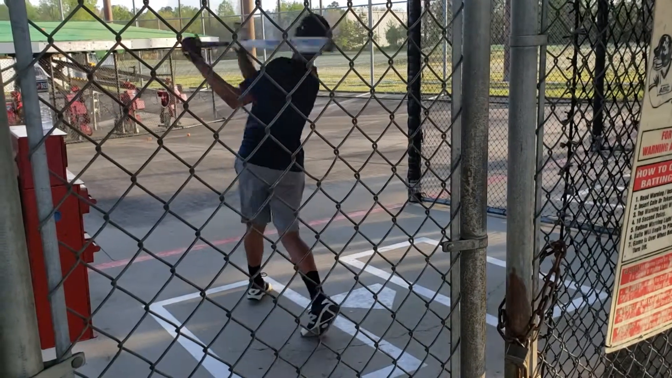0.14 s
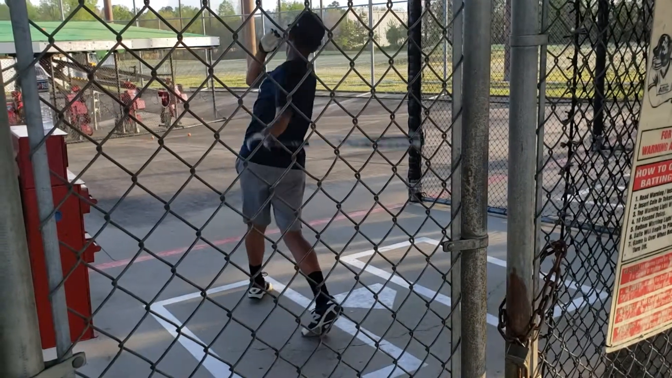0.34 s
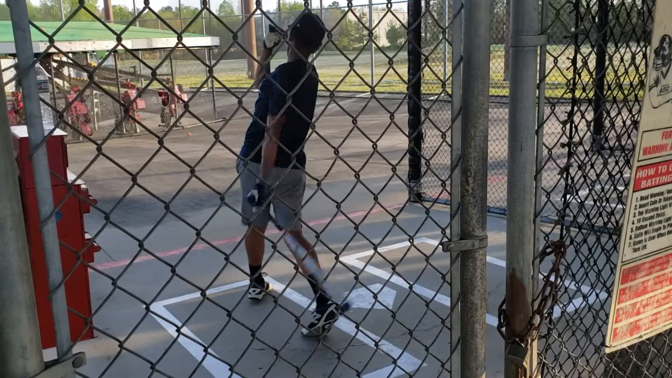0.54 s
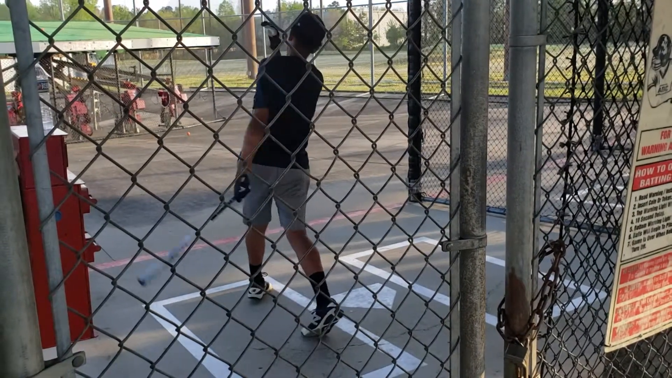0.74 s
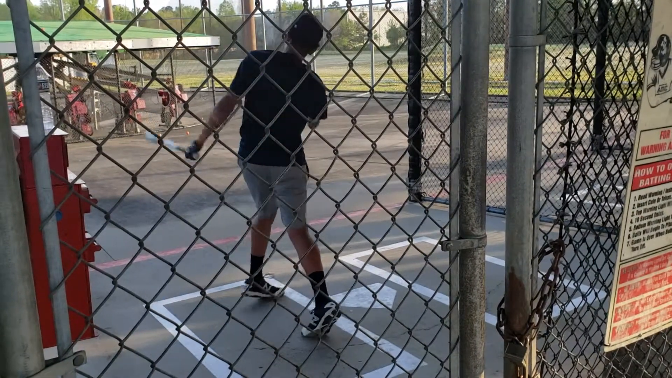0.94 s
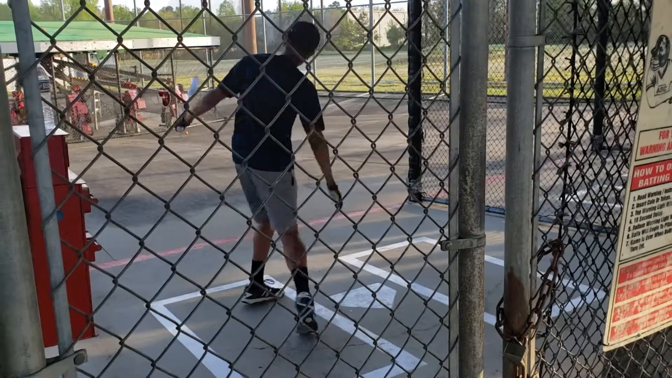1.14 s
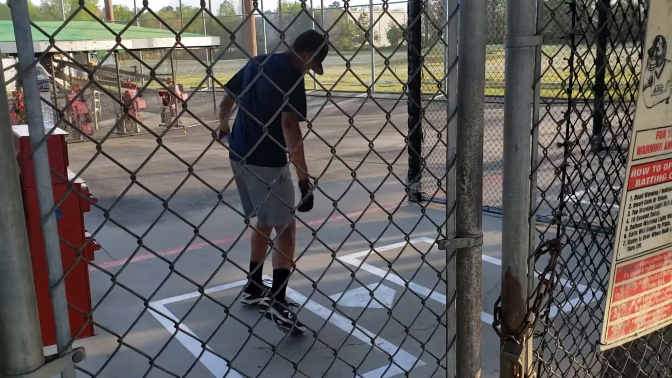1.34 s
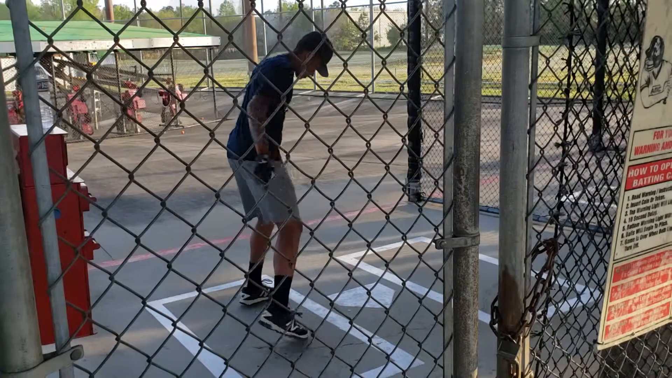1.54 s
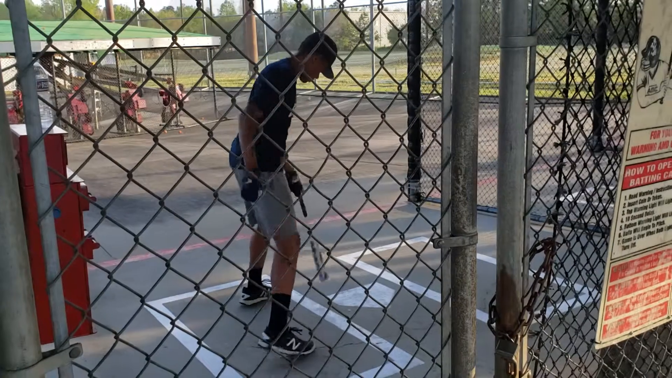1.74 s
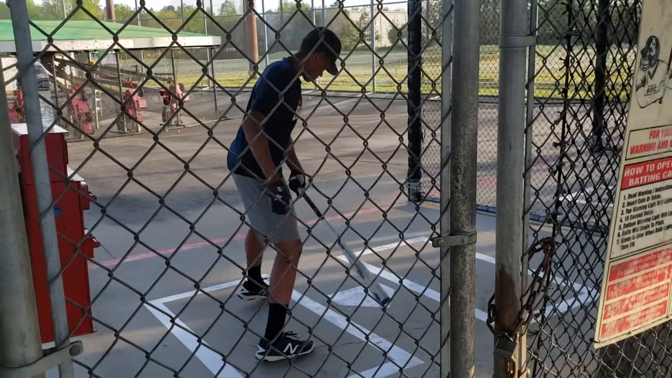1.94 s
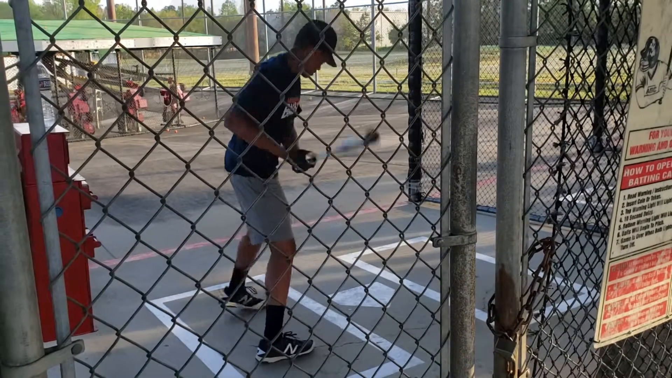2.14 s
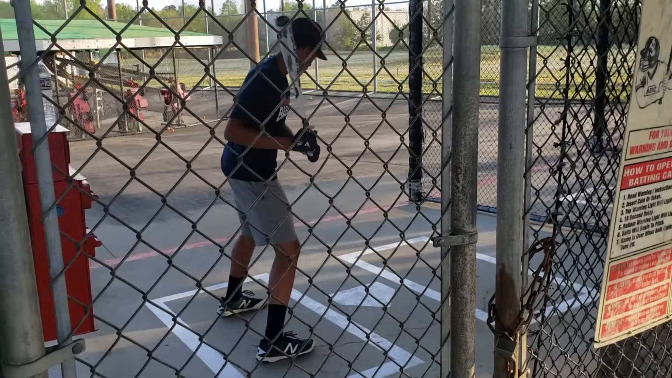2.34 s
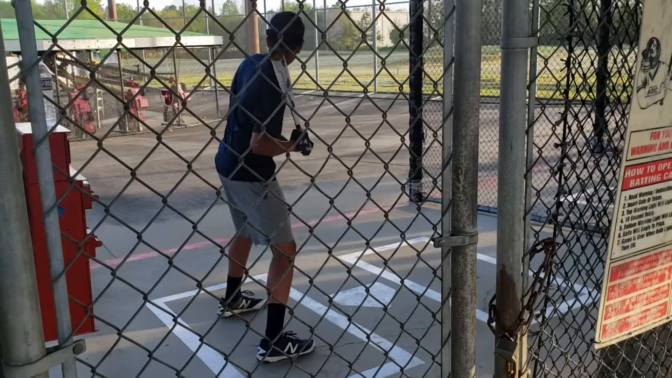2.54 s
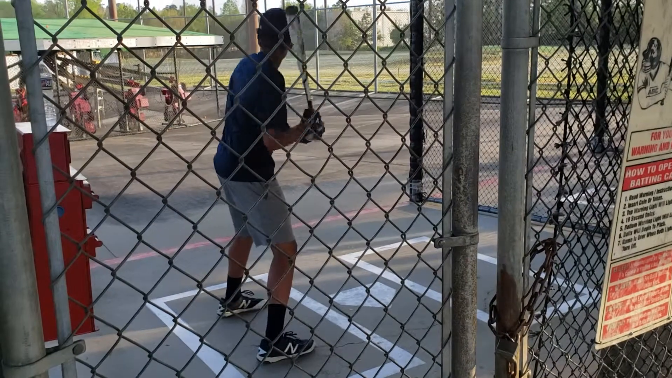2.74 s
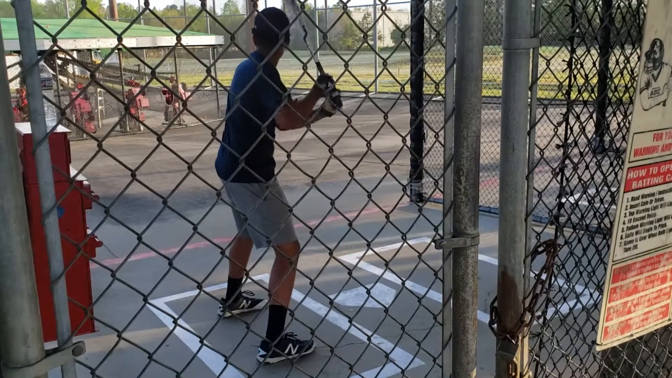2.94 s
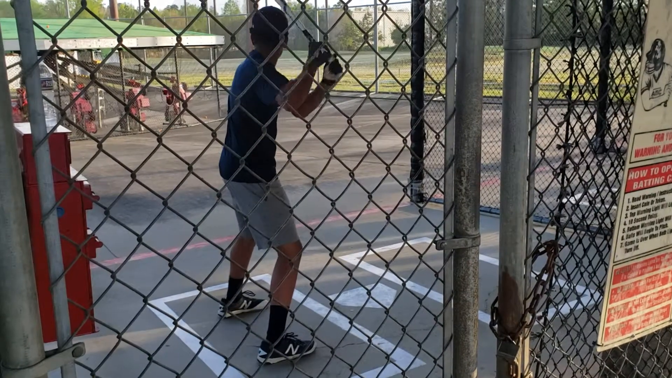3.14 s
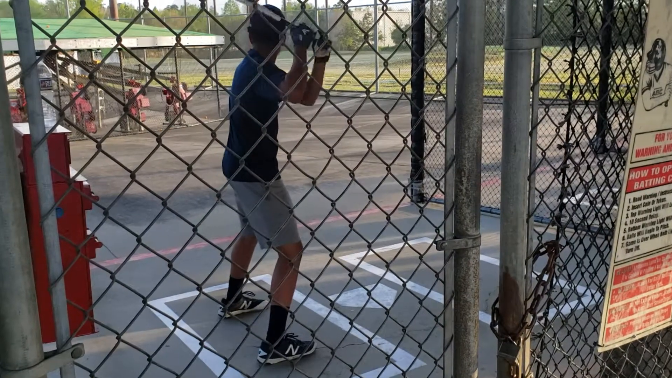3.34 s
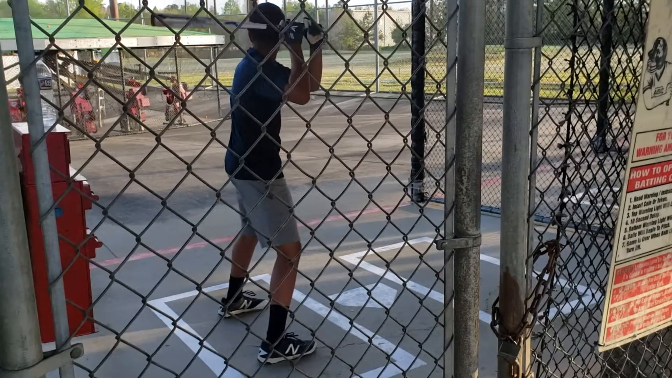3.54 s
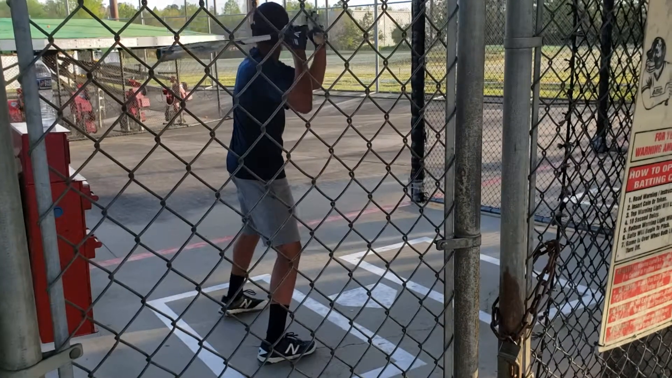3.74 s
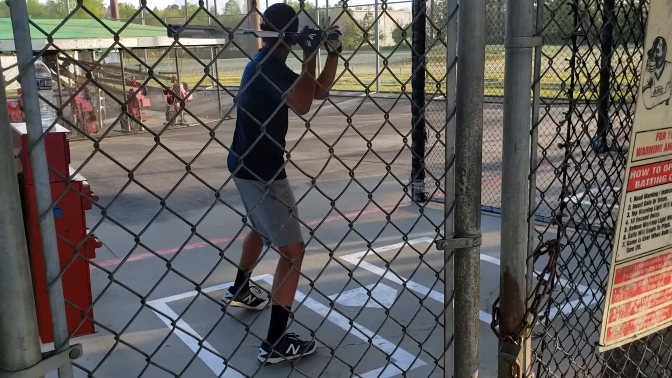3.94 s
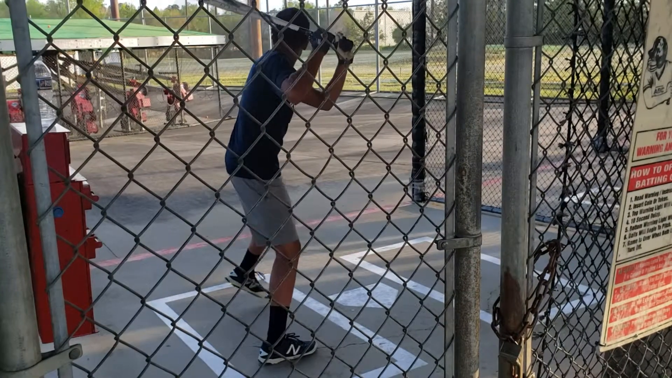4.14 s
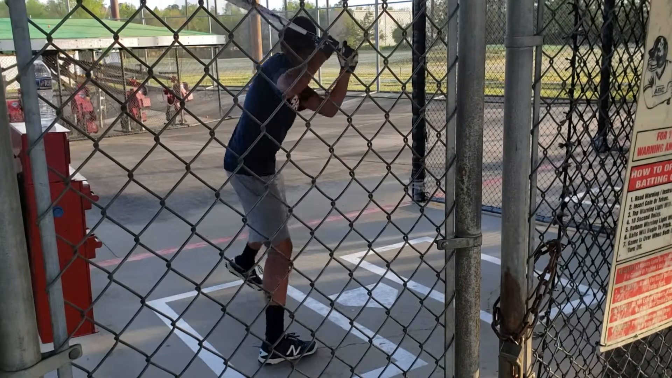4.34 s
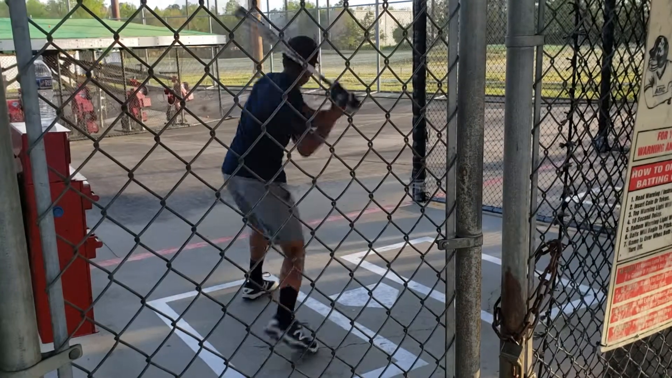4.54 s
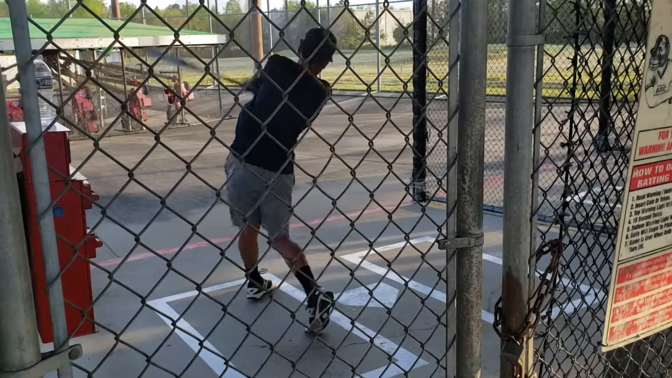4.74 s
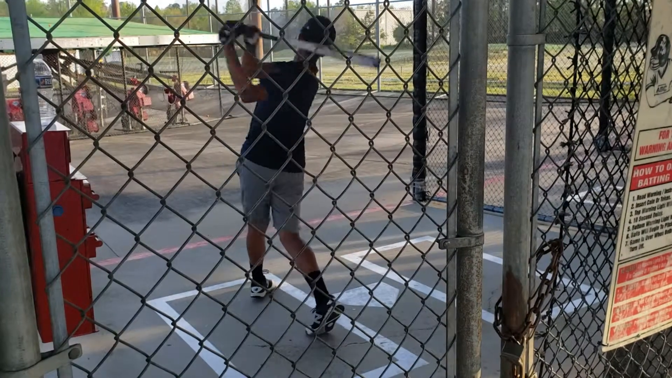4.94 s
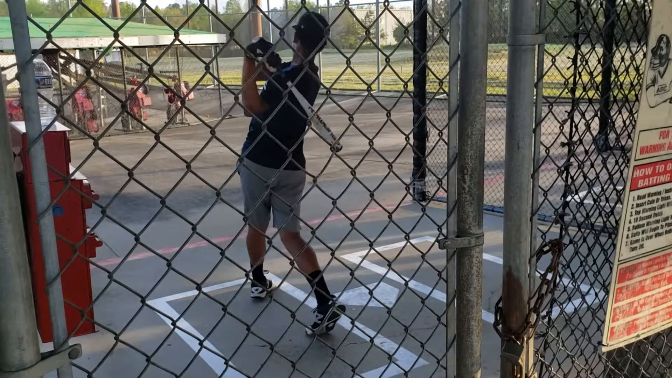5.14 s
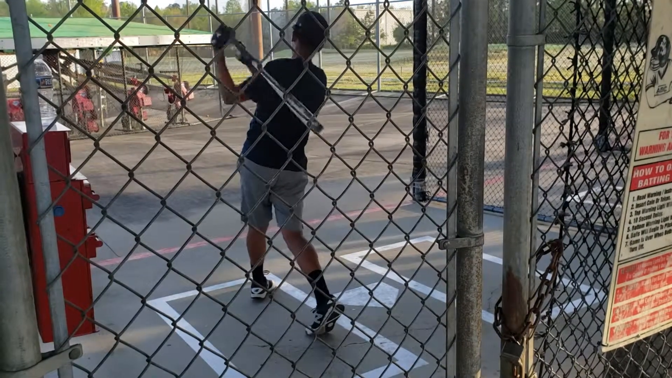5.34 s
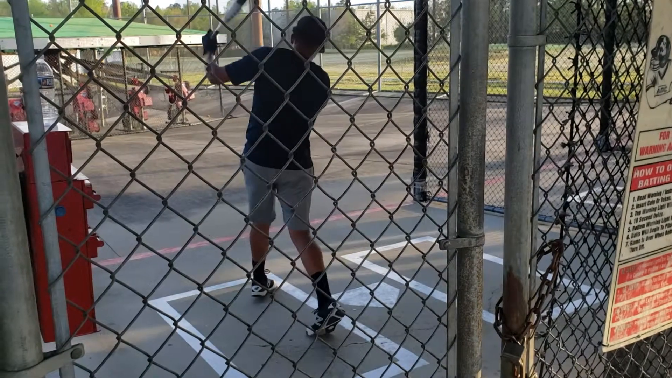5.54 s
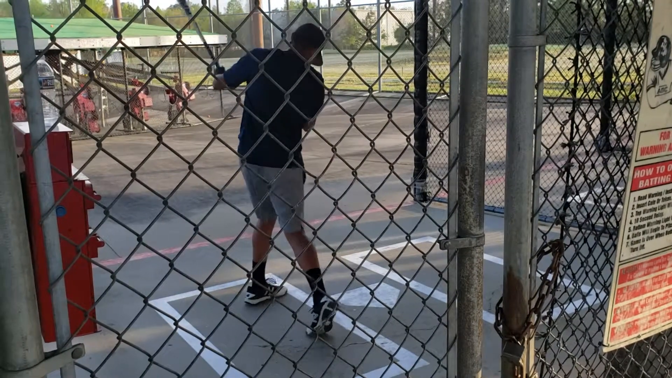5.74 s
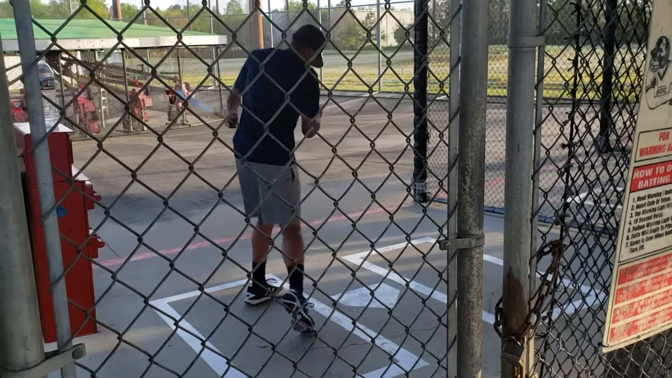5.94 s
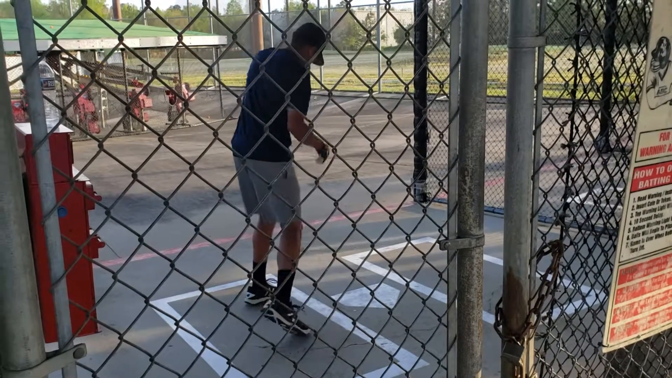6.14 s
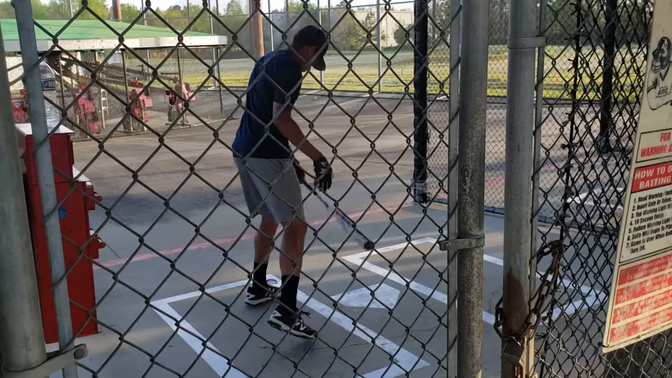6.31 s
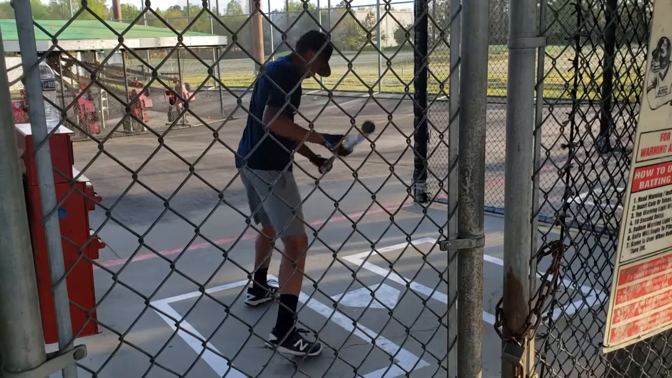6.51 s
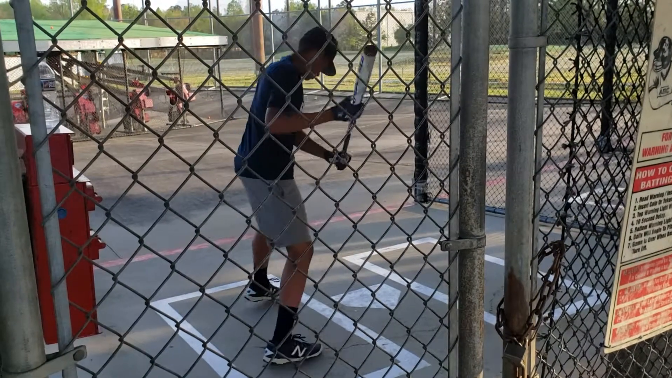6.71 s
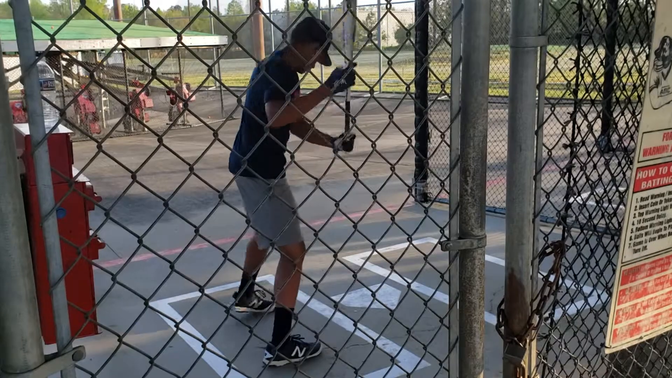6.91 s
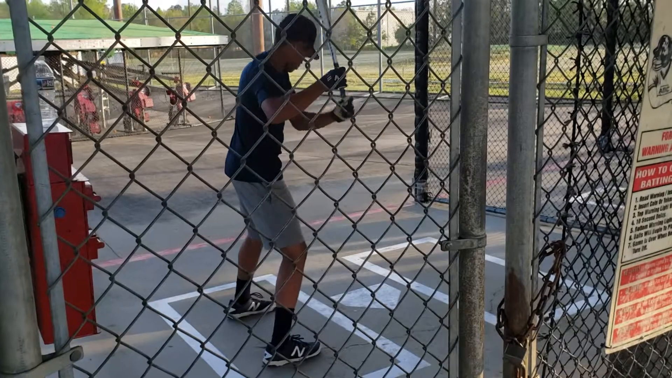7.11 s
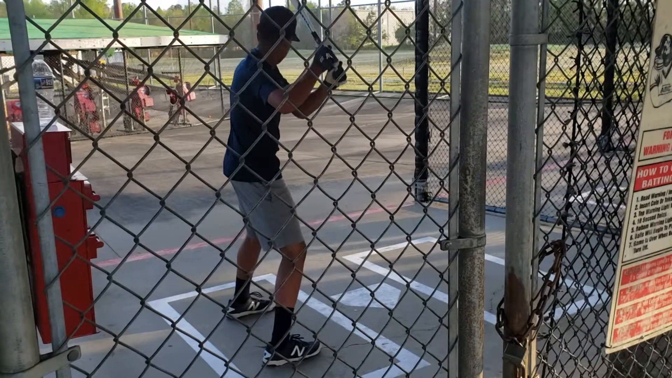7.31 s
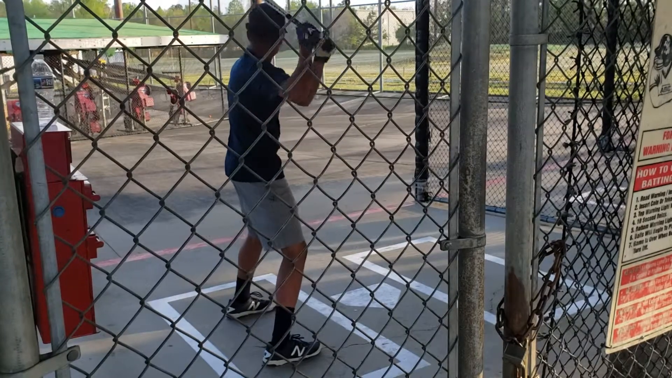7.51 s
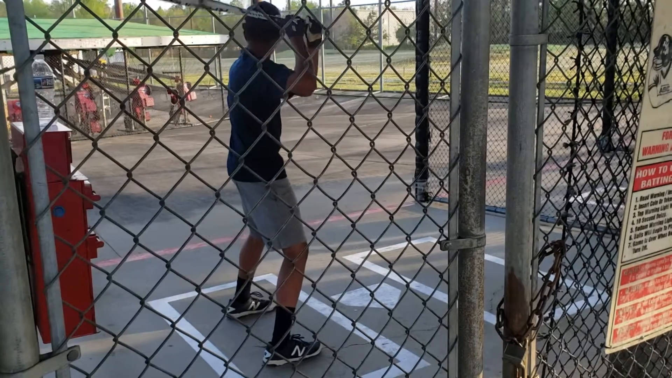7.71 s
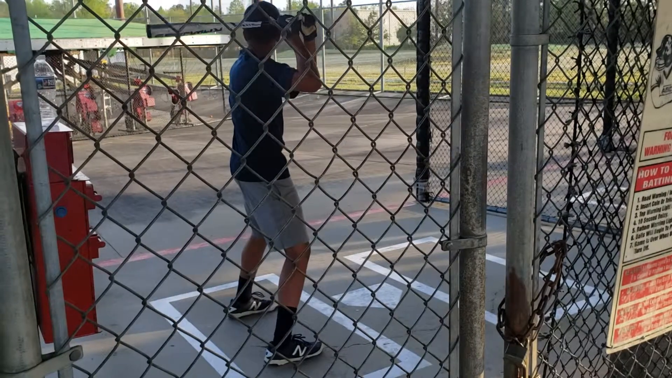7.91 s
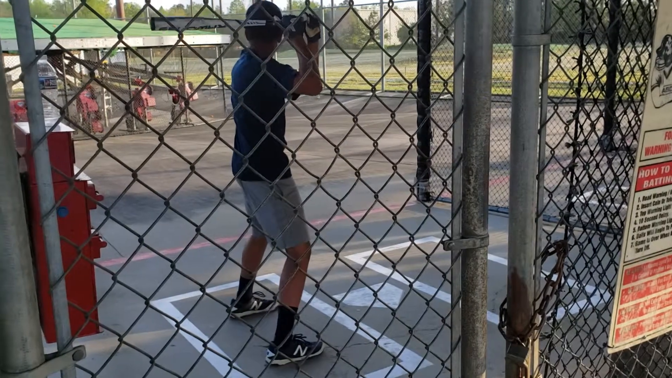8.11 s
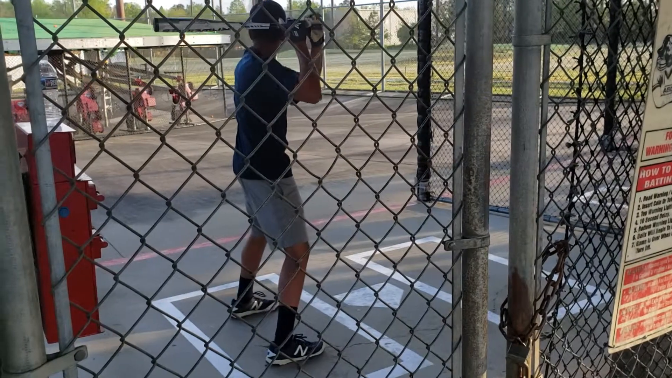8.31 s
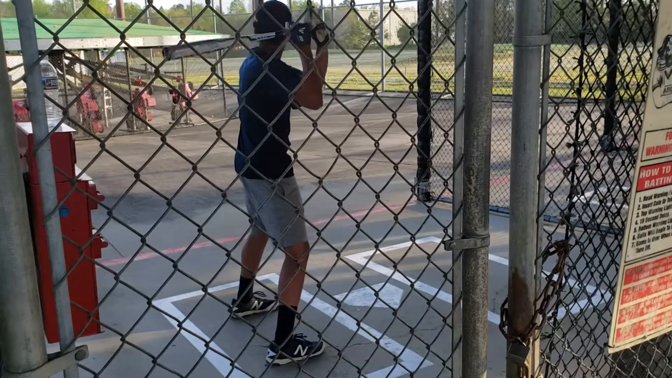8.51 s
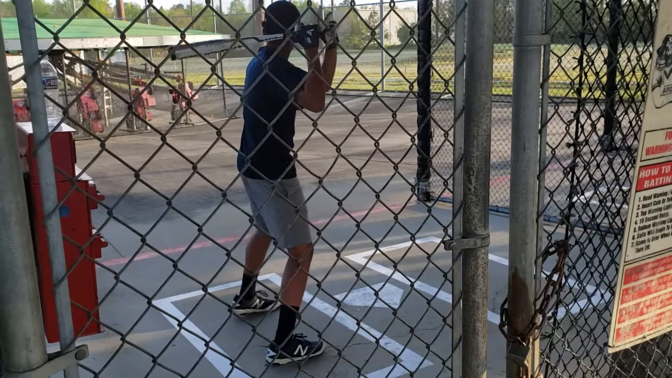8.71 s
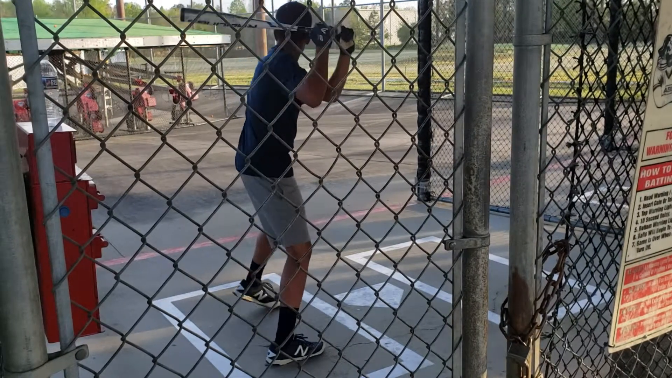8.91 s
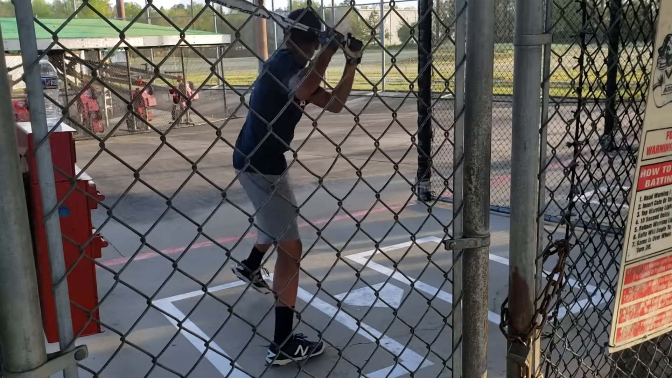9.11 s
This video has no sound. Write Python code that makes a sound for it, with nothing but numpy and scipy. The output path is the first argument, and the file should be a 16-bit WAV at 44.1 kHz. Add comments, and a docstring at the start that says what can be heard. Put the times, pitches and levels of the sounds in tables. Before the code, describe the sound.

A metal bat pings against a ball right in front of a stereo microphone, over the low drone of pitching machines in a batting cage. After faint distant chirps and a short squeak comes a dull backstop thud. A hollow launch thunk leads to another bright, ringing hit and a brief rattle of netting. The hum drops for about two seconds after each ping, and a last launch thunk closes the scene.

```python
"""A roofed batting cage, heard through a camera's stereo microphone. Straight ahead an aluminium bat hits
two pitched balls, its barrel ringing as it swings round. Off to the left, pitching machines hum and
launch balls with a hollow thunk, one ball thuds on a backstop, others rattle the netting, and something
squeaks once. A few faint chirps come from far off. Each ping makes the camera's gain control turn the
whole yard down for about two seconds."""
import sys
import numpy as np
from scipy import signal
from scipy.fft import rfft, irfft, next_fast_len
from scipy.io import wavfile
from scipy.ndimage import uniform_filter1d, minimum_filter1d, map_coordinates

SR = 44100
rng = np.random.default_rng(int(sys.argv[2]) if len(sys.argv) > 2 else 0)


def file_out(sig):
    """Save sig as 16-bit WAV at sys.argv[1]."""
    # one column per channel
    cols = np.atleast_2d(sig).T
    # limit, then scale
    lim = np.clip(cols, -1, 1)
    pcm = np.round(lim * 32767).astype(np.int16)
    wavfile.write(sys.argv[1], SR, pcm)


N = 403956

# Bat on ball, straight ahead. Each row: start in seconds, ring, crack and knock levels in dB,
# off-centre share from 0 to 1, lobe strength from 0 to 1.
BAT_HITS = [(-0.012, -8.5, -21.5, -24, 0.79, 0), (4.7094, -6, -11, -16, 0.03, 1.0)]
# The barrel's modes. Each row: frequency in Hz, sweet-spot and off-centre levels in dB, t60 in seconds,
# lobe gain in dB, seconds after the blow when the lobe faces the microphone.
BARREL_MODES = [(2602.5, -4, -0.5, 0.18, 2, 0.092), (2772, -24.5, -9, 0.52, 26, 0.123),
                (2810, -18.5, -5, 0.48, 18, 0.1), (3194, 2.5, -8.5, 0.222, 4.5, 0.094),
                (3220, -12, -6.5, .25, 3, 0.11), (3430, -22, 1.5, 0.22, 39, 0.08899),
                (4210, 2, -35, 0.25, 0, 0.104), (4380, -9, -43, 0.27, 6, .1),
                (4590, -14, -36, 0.3, 11, .09), (5230, -32.5, -8.5, 0.21, -2, 0.058),
                (5680, -32, -12, 0.23, -3, .05), (6400, -2.5, -26.5, 0.17, -11, 0.039),
                (7400, -11.5, -21.5, 0.21, -5, .05), (13240, -14.5, -40, .13, -5.5, .05)]
# Balls leaving the machine. Each row: start in seconds, thunk level in dB, tick level in dB.
LAUNCHES = [(4.163, -24.5, -42), (9.043, -21.5, -42.5)]
# A ball on the backstop. Each row: start in seconds, level in dB.
BACKSTOP_THUDS = [(3.367, -17)]
# Modes of the chute and the backstop. Each row: frequency in Hz, relative level in dB, t60 in seconds.
CHUTE_MODES = [(302, -2, 0.48), (332, 1.5, 0.15), (368, -4, 0.29), (452, -9.5, 0.24), (164, -9, .25)]
BACKSTOP_MODES = [(103, -1.5, 0.8), (129.3, 0.5, 0.47), (167, 0.5, 0.32), (212, 4.5, 0.37), (330, 3, 0.27),
                  (386.5, -3.5, 0.44), (470, -13, 0.26), (553, -22, .25), (705, 1, .28)]
# Balls and knocks in the netting. Each row: start in seconds, level in dB, t60 in seconds.
NET_RATTLES = [(0.479, -53, 0.069), (0.829, -46.5, 0.24), (0.97, -55, .2), (1.83, -56, 0.087),
               (2.06, -52, 0.45), (2.81, -47.5, 0.06), (4.53, -48, 0.1), (4.948, -35, 0.58),
               (6.047, -36.5, 0.16), (8.33, -55.5, 0.12)]
# The squeal's overtones. Each row: multiple of the pitch, relative level in dB.
SQUEAK_OVERTONES = [(2, -5), (3, -17), (4, -22), (5, -19.5), (6, -36), (7, -41), (8, -41)]
# The wheels slow a little. Each row: time in seconds, drone pitch in Hz, dB on top of the drone's cycle.
WHEEL_DRIFT = [(0, 83.4, -1.5), (2.6, 83.24, -1), (3.8, 82.7, 2.5), (5.3, 79.56, 1), (7.3, 76.36, -1.5),
               (9.16, 76.46, -4)]
# The drone's swell in every pitching cycle. Each row: seconds after a pitch, level in dB.
DRONE_SWELL = [(0, -38.5), (0.22, -44), (0.47, -29.5), (0.75, -37.5), (1.1, -31), (1.5, -43), (2.6, -42.5),
               (3.55, -37)]
# The motors' hum. Each row: frequency in Hz, relative level in dB.
MOTOR_TONES = [(150.7, -8.5), (296.1, -13), (360, -11), (441.4, -10), (915, -15)]
# Machine housing resonances in the hiss. Each row: centre in Hz, width in Hz, boost in dB.
HOUSING_PEAKS = [(900, 200, 2.5), (3310, 170, 4.5), (4800, 400, 3)]
# Far chirps and clinks. Each row: start in seconds, pitch in Hz, level in dB, t60 in seconds,
# width as a share of the pitch.
FAR_CHIRPS = [(.75, 4300, -45.5, 0.35, .05), (1.46, 557, -37, 0.62, 0.013), (1.748, 2100, -35, 0.077, 0.14),
              (5.5, 3400, -43, 0.61, 0.14), (5.62, 2160, -41, 0.59, .06), (6.965, 3920, -38, 0.19, 0.1)]
# The batter shifts his feet. Each row: start in seconds, length in seconds, lowest grit level in dB.
FOOT_SHIFTS = [(0.897, 2.2, -61), (2.783, 0.52, -53.5), (5.894, 1.1, -61)]
# His clothes as he moves the bat. Each row: peak time in seconds, level in dB, half-length in seconds.
CLOTH_SWELLS = [(5.224, -62, 0.112), (5.67, -65, .05), (7.0, -68, 0.14)]
# Noise colours at the microphone. Each row: frequency in Hz, relative level in dB.
CRACK_SPECTRUM = [(300, -24.5), (900, -8), (1600, 0.5), (2500, 1.5), (6000, 4), (8000, 3.5), (9200, -4.5),
                  (13500, -1.5), (15500, -19.5)]  # the bat at contact
KNOCK_SPECTRUM = [(80, -28.5), (240, -11), (400, -5), (520, -3.5), (750, -5), (1150, -12), (2200, -12.5),
                  (6000, -53.5)]  # the ball at contact
BOOM_SPECTRUM = [(60, -17.5), (220, -13), (320, -2), (460, -3), (620, -18), (850, -8.5), (1400, -27.5),
                 (6000, -48.5)]  # the chute
TICK_SPECTRUM = [(1000, -23), (4000, -13), (5500, 3.5), (8500, -8.5), (12000, -1.5), (15500, -14.5)]  # wheels grabbing a ball
SLAP_SPECTRUM = [(50, -3), (130, 1.5), (400, -7), (750, -2), (1080, -11.5), (1300, -15), (3000, -20.5),
                 (5700, -21.5), (8500, -40), (15000, -53.5)]  # the backstop panel
WIRE_SPECTRUM = [(300, -18), (900, 6.5), (2000, 3), (4500, 0.5), (7400, -0.5), (9000, -10), (12500, -5.5),
                 (15500, -14)]  # netting and grit
HISS_SPECTRUM = [(3000, -24.5), (7000, -3), (9200, -6.5), (10000, -9), (11400, -2.5), (13000, -7),
                 (15500, -21)]  # sliding ball, swing and cloth
RUMBLE_SPECTRUM = [(12, -59), (20, -25), (59, -2), (81, 0.5), (155, -9.5), (179, -13.5), (290, -12.5),
                   (354, -14), (409, -16), (439, -14.5), (499, -26), (600, -25.5), (780, -50), (1320, -120)]  # the machines
AIR_SPECTRUM = [(290, -33), (500, -9), (649, -10), (697, -4), (917, -3.5), (986, -6.5), (1210, -9.5),
                (1500, -12.5), (1970, -12), (2960, -17.5), (3270, -20), (4760, -21.5), (7670, -29),
                (8860, -38.5), (15800, -46)]  # the open yard
# Likeness of the microphone's two ports. Each row: frequency in Hz, left-right correlation.
PORT_LIKENESS = [(60, 0.897), (300, 0.98), (700, 0.78), (1500, 0.57), (5000, 0.098), (14000, 0.14)]
# Reverberation under the roof. Each row: frequency in Hz, t60 in seconds.
CAGE_DECAY = [(100, 0.65), (600, 0.41), (3000, 0.39), (7000, 0.36), (14000, 0.21)]


def bat():
    """A crack, the ball's knock, and barrel modes whose lobes sweep past the microphone in the swing."""
    out, t = np.zeros((2, N)), np.arange(SR) / SR
    doppler = 1 + .005 * np.sin(2 * np.pi * 13 * (t - .018)) * fade(.8)
    for start, ring_db, crack_db, knock_db, off_centre, lobe_strength in BAT_HITS:
        barrel = np.zeros((2, SR))
        for hz, sweet_db, off_db, t60, lobe_db, facing_s in BARREL_MODES:
            mode_db = sweet_db + off_centre * (off_db - sweet_db)
            lobe = 1 + (amp(lobe_strength * lobe_db) - 1) * np.exp(-((t - facing_s) / 0.013) ** 2)
            phase = 2 * np.pi * (hz * np.cumsum(doppler) / SR + rng.random())
            # paths from the moving barrel interfere differently at each port
            flutter = np.array([0.8 * wobble(90, SR) + 0.5 * wobble(380, SR) for port in range(2)])
            barrel += amp(mode_db) * lobe * fade(t60) * np.sin(phase + (1.1 + 0.22 * lobe_strength) * flutter)
        barrel *= amp(ring_db) * onset(0.0029)
        snap = amp(12) * burst(CRACK_SPECTRUM, t60=.01, rise=.0001)
        crack = amp(crack_db) * (snap + amp(-2) * burst(CRACK_SPECTRUM, t60=0.18, rise=0.0032))
        knock = amp(knock_db) * burst(KNOCK_SPECTRUM, t60=0.07, rise=0.00099)
        roof_echo = 1.78 * np.roll(knock, round(0.015 * SR), axis=1)
        ping = cage(barrel, wet_db=-7.5) * lean_left(1.6)
        add(out, start, ping + cage(crack + knock + roof_echo, wet_db=-5.5))
    return out


def pitches():
    """The wheels grab a ball with a tick and the chute booms."""
    out = np.zeros((2, N))
    for start, thunk_db, tick_db in LAUNCHES:
        thunk = 0.77 * ring(CHUTE_MODES) + amp(-3) * burst(BOOM_SPECTRUM, t60=0.53, rise=0.013)
        tick = 2.1 * burst(TICK_SPECTRUM, t60=.02, rise=.0003)
        tick += 0.48 * burst(TICK_SPECTRUM, t60=0.21, rise=.003)
        add(out, start, cage(amp(thunk_db) * thunk + amp(tick_db) * tick, wet_db=-8.5))
    return out


def backstop():
    """A ball sinks into a hanging panel, which booms and shakes its fence."""
    out = np.zeros((2, N))
    for start, db in BACKSTOP_THUDS:
        panel = amp(-7) * ring(BACKSTOP_MODES) + amp(2.5) * burst(SLAP_SPECTRUM, t60=0.31, rise=0.0201)
        add(out, start, amp(db) * cage(panel, wet_db=-3))
    return out


def squeak(start=2.248, swell_s=0.142, gripped_hz=1618, slack_hz=31.9, slip_hz=29.7, stutter_t60=0.7):
    """A stick-slip squeal: a pure swell, then brighter, raspier and stuttering as it loses grip."""
    t = np.maximum(np.arange(N) / SR - start, 0)
    grip = np.exp(-((t - .7 * swell_s) / 0.14) ** 4)
    hz = gripped_hz + slack_hz * (1 - grip)
    phase = 2 * np.pi * np.cumsum(hz * (1 + 0.0031 * wobble(200))) / SR
    swell = amp(-14.5) * np.sin(np.pi * np.minimum(t / swell_s, 1) ** 1.6) ** 2
    slipping_s = np.maximum(t - swell_s, 0)
    slips = np.abs(np.sin(np.pi * slip_hz * slipping_s))
    stutter = amp(-24.5 - 60 * slipping_s / stutter_t60) * slips * grip ** .125
    brightness = amp(-26.5) * np.exp(-((t - 0.12) / 0.084) ** 2) * (1 - np.exp(-t / .01))
    overtones = sum(amp(db + 3.674 * wobble(40.3)) * np.sin(k * phase) for k, db in SQUEAK_OVERTONES)
    rasp = amp(-16.5) * noise([(1200, -20), (2200, -0.5), (5500, -4.5), (9000, -29)])
    tone = swell * np.sin(phase) + stutter * (np.sin(phase) + amp(-11) * np.sin(2 * phase))
    return cage(tone + brightness * (overtones + rasp), wet_db=-11) * lean_left(1.6)


def netting():
    """Wire links chatter briefly where a ball lands."""
    out = np.zeros((2, N))
    for start, db, t60 in NET_RATTLES:
        chatter = amp(db + 2.7 * wobble(400, SR))
        add(out, start, cage(chatter * burst(WIRE_SPECTRUM, t60, rise=0.0018), wet_db=-9.5))
    return out


def machines():
    """Spinning wheels drone and beat against each other over a rumble and the motors' hum."""
    t = np.arange(N) / SR
    times, pitch, trim = np.transpose(WHEEL_DRIFT)
    drone_hz, trim_db = np.interp(t, times, pitch), np.interp(t, times, trim)
    first, second = LAUNCHES[0][0], LAUNCHES[1][0]
    cycle_db = np.interp(t - first, *np.transpose(DRONE_SWELL), period=second - first)
    drone_gain = amp(cycle_db + trim_db + 1.3 * wobble(15))
    drone = hum(drone_hz, drift=0.37) + amp(-9.5) * hum(76.5, drift=1.6)
    motors = sum(amp(db + 1.8 * wobble(6)) * hum(hz, drift=1.34) for hz, db in MOTOR_TONES)
    rumble_gain = amp(-34.5 + 0.27 * trim_db + 0.7 * wobble(14))  # partly follows the wheels
    return drone_gain * drone + rumble_gain * (noise(RUMBLE_SPECTRUM) + amp(-6.5) * motors)


def chirps():
    """Faint narrow calls and clinks, smeared by distance."""
    out = np.zeros((2, N))
    for start, hz, db, t60, width in FAR_CHIRPS:
        white = rng.standard_normal((2, SR))
        band = unit(filtered(white, lambda f: np.exp(-((f / hz - 1) / width) ** 2)))
        add(out, start, amp(db) * band * fade(t60) * onset(0.0564 * t60))
    return out


def grit(ticks=10):
    """Grit ticks under the batter's shoes while he steps back into his stance."""
    out = np.zeros((2, N))
    for start, length, db in FOOT_SHIFTS:
        for when, size in rng.random((ticks, 2)):
            tick = amp(db + 11 * size) * burst(WIRE_SPECTRUM, t60=0.02, rise=.0004)
            add(out, start + when * length, tick)
    return cage(out, wet_db=-8.5)


def ball_feed(lead_s=0.38):
    """A thin hiss as each ball slides towards the wheels."""
    out = np.zeros((2, N))
    for launch, *_ in LAUNCHES:
        add(out, launch - lead_s, amp(-55) * burst(HISS_SPECTRUM, t60=1.2, rise=0.06))
    return out


def swish(rise_s=0.11):
    """The swing hisses ever louder over the second before each hit."""
    out, seconds_left = np.zeros((2, N)), 1 - np.arange(SR) / SR
    for contact, *_ in BAT_HITS:
        add(out, contact - 1, amp(-54.5) * np.exp(-seconds_left / rise_s) * noise(HISS_SPECTRUM, SR))
    return out


def rustle():
    """The batter's clothes rustle in soft swells."""
    t = np.arange(N) / SR
    swells = sum(amp(db) * np.exp(-((t - peak) / half) ** 2) for peak, db, half in CLOTH_SWELLS)
    return swells * amp(2 * wobble(60)) * noise(HISS_SPECTRUM)


def air():
    """The hiss of the open yard, coloured by the machine housings."""
    def housing(f):
        return amp(sum(db * np.exp(-((f - hz) / width) ** 2) for hz, width, db in HOUSING_PEAKS))
    return amp(-45 + 1.1 * wobble(12)) * filtered(noise(AIR_SPECTRUM), housing)


def cage(x, wet_db):
    """Direct sound plus a diffuse answer from slab, roof and posts."""
    hz, t, white = signal.stft(noise([(100, 0), (1000, 0)], SR // 2), SR, nperseg=256)
    decay = amp(-60 * t / along(CAGE_DECAY, hz)[:, None])
    tail = signal.istft(white * decay * (1 - np.exp(-t / 0.0034)), SR, nperseg=256)[1]
    tail /= np.linalg.norm(tail[0])
    return x + amp(wet_db) * signal.fftconvolve(x, tail, axes=1)[:, :x.shape[1]]


def amp(db):
    """Decibels to gain."""
    return 10 ** (np.asarray(db) / 20)


def unit(x):
    """Scale to rms 1."""
    return x / np.sqrt(np.mean(x ** 2) + 1e-20)


def along(points, hz):
    """Interpolate (Hz, value) points on a log axis."""
    knots, values = np.transpose(points)
    return np.interp(np.log(hz + 1), np.log(knots + 1), values)


def wobble(rate, size=N):
    """A smooth random curve, rate knots a second."""
    return map_coordinates(rng.standard_normal(int(size * rate / SR) + 4), [np.arange(size) * rate / SR])


def filtered(x, response):
    """Shape x by a function of frequency."""
    size = x.shape[-1]
    padded = next_fast_len(size + 8192)
    return irfft(rfft(x, padded) * response(np.fft.rfftfreq(padded, 1 / SR)), padded)[..., :size]


def noise(spectrum, size=N):
    """Stereo noise of rms 1: alike in the bass, less so in the treble."""
    def colour(hz):
        angle = np.arccos(along(PORT_LIKENESS, hz)) / 2
        return amp(along(spectrum, hz)) * np.array([np.cos(angle), np.sin(angle)])
    mid, side = filtered(rng.standard_normal((2, size)), colour)
    return unit(np.array([mid + side, mid - side]))


def add(track, start_s, sound):
    """Mix a sound into a track."""
    start = round(start_s * SR)
    part = sound[:, max(-start, 0):N - start]
    track[:, max(start, 0):][:, :part.shape[1]] += part


def fade(t60):
    """One second of decay, falling 60 dB in t60 seconds."""
    return 1000 ** (-np.arange(SR) / SR / t60)


def onset(rise):
    """One second of climb towards 1, time constant rise."""
    return 1 - np.exp(-np.arange(SR) / SR / rise)


def burst(spectrum, t60, rise):
    """One second of coloured noise that rises and dies away."""
    return noise(spectrum, SR) * fade(t60) * onset(rise)


def ring(modes):
    """A struck body: damped sines starting together."""
    t = np.arange(SR) / SR
    sines = (amp(db) * fade(t60) * np.sin(2 * np.pi * (hz * t + rng.random())) for hz, db, t60 in modes)
    return sum(sines) * onset(0.00244)


def hum(hz, drift):
    """A sine of rms 1 whose phase wanders by about drift radians."""
    return np.sqrt(2) * np.sin(2 * np.pi * np.cumsum(hz * np.ones(N)) / SR + drift * wobble(5))


def lean_left(db):
    """Stereo gains with the left db above the right."""
    return amp([[db / 2], [-db / 2]])


def from_left(x, lead_s=.00018):
    """Sound from the left reaches that port a little earlier and louder."""
    return filtered(x, lambda hz: np.exp(1j * np.pi * lead_s * hz * np.array([[1], [-1]]))) * lean_left(.5)


def gain_control(x, sense_hz=2400, threshold_db=-29, max_cut_db=7, hold_s=2.08, recover_db_per_s=9.5):
    """Loud treble turns everything down at once; the camera's gain waits, then creeps back up."""
    treble = filtered(x, lambda hz: hz > sense_hz)
    power = np.abs(uniform_filter1d(np.mean(treble ** 2, axis=0), size=256))
    needed_db = np.clip(threshold_db - 10 * np.log10(power + 1e-12), -max_cut_db, 0)
    hold = int(hold_s * SR)
    held_db = minimum_filter1d(needed_db, hold, origin=(hold - 1) // 2)
    climb_db = recover_db_per_s * np.arange(N) / SR
    return x * amp(np.minimum.accumulate(held_db - climb_db) + climb_db)


def scene():
    """The batter stands in front of the microphone; machines, backstop and netting lie to the left."""
    left_side = machines() + air() + ball_feed() + pitches() + backstop() + netting() + squeak()
    return bat() + swish() + rustle() + grit() + chirps() + from_left(left_side)


def record(dry):
    """The camera rides its gain and keeps nothing above its band limit."""
    return filtered(gain_control(dry), lambda hz: hz < 15800)


dry = scene()
out = record(dry)
file_out(out)
```